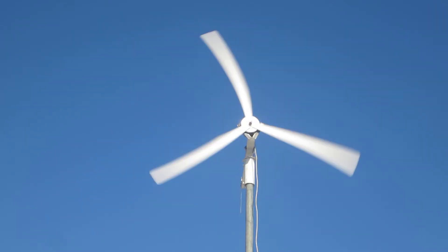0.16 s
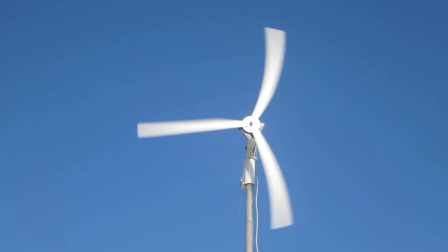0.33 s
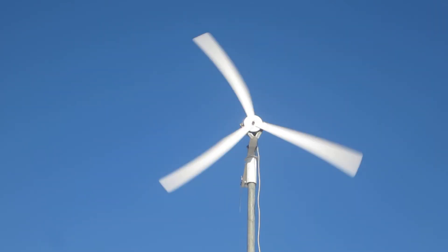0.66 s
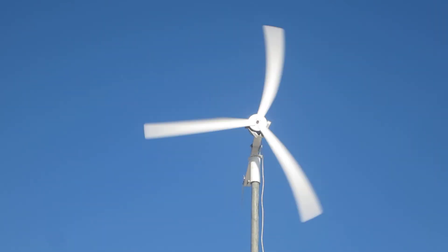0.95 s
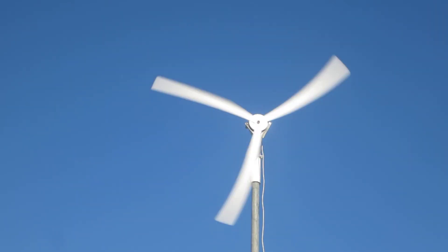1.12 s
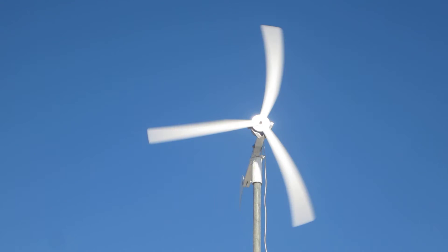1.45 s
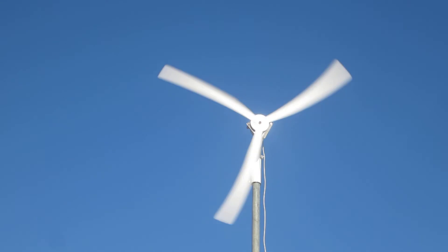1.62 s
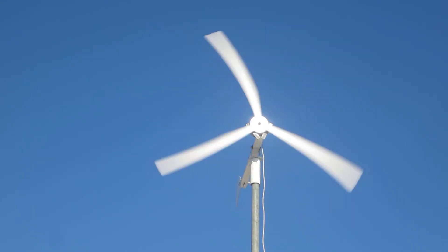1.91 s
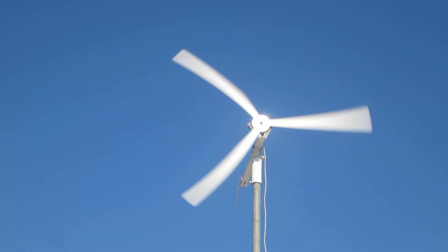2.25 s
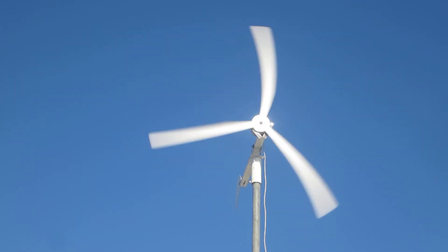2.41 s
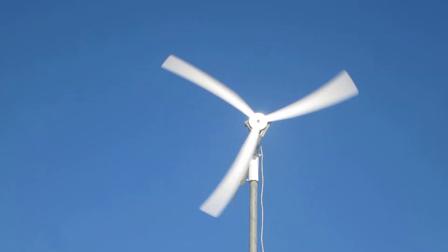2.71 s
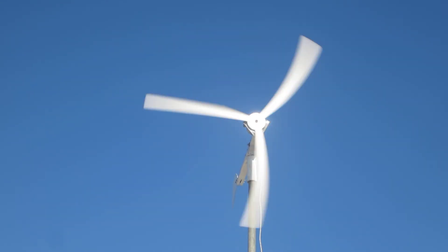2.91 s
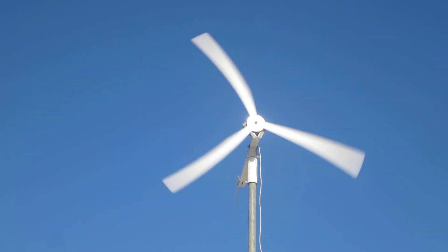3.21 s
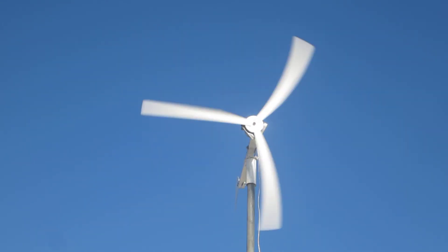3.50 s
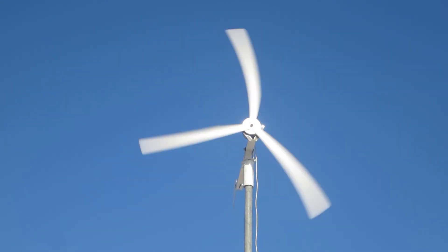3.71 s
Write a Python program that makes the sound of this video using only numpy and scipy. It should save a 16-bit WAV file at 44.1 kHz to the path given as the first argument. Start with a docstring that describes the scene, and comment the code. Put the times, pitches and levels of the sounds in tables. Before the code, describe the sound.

Low wind rumble close on the microphone, with soft hiss behind and a barely audible thin whine; a tiny bright click comes first, gusts thump early, ease off, and return strongly late.

```python
"""Wind blows across a microphone under a small wind turbine: shaped noise rumbles and flutters in gusts.
Single eddies thump the microphone as short pressure swings, each with a faster ragged edge.
One sharp tick near the start is a set of decaying sines plus a tiny noise scrape.
Behind them: a faint hollow moan and steady hiss with brief swells (band noise), and a thin whine (sines)."""
import sys
import numpy as np
from scipy import signal
from scipy.fft import rfft, irfft
from scipy.io import wavfile

SR = 44100
rng = np.random.default_rng(int(sys.argv[2]) if len(sys.argv) > 2 else 0)


def generate_wav(signal):
    """Clip the signal to [-1, 1] and save it as 16-bit WAV at the path in sys.argv[1]."""
    frames = np.transpose(np.atleast_2d(signal))
    scaled = np.clip(frames, -1, 1) * 32767
    pcm = np.round(scaled).astype(np.int16)
    wavfile.write(sys.argv[1], SR, pcm)


N = 170226
TIME_S = np.arange(N) / SR

# wind strength at the microphone: t/s, relative strength/dB
WIND = [(0, 2), (.1, -6.5), (.23, 7.5), (.34, -2.5), (.44, -6), (.55, -1.5), (.66, -0.5), (.8, -3.5),
        (.96, -5), (1.17, -1.5), (1.27, -2), (1.38, -1), (1.47, -3.5), (1.6, -3), (1.72, -7), (1.87, 0),
        (2.05, -7), (2.33, -4.5), (2.58, -7.5), (2.78, -4.5), (2.92, 0), (3.15, -4), (3.3, -1), (3.44, 2.5),
        (3.56, 1.5), (3.69, 1.5), (3.76, 0), (3.86, 1.5)]
# turbulence spectra: f/Hz, relative density/dB
RUMBLE_SPECTRUM = [(8, -21), (22, -6.5), (45, -0.5), (95, -2), (140, -7.5), (220, -18.5), (400, -37),
                   (1000, -78)]
FLUTTER_SPECTRUM = [(40, -22), (100, -7.5), (150, -1), (250, -5.5), (350, -16), (520, -29.5), (1000, -60),
                    (3000, -61)]
# eddies: t/s, relative level/dB, nominal f/Hz, edge level re eddy/dB
EDDIES = [(.146, -17, 91, -22), (0.185, -23.5, 146, -25), (0.198, -15, 210, -26), (0.215, -16.5, 265, -31),
          (0.225, -14, 135, -14.5), (.251, -12, 159, -22), (.276, -15.5, 119, -30), (0.302, -20, 132, -31),
          (0.509, -11.5, 251, -34), (.522, -24, 150, -23), (0.633, -21.5, 100, -24),
          (0.652, -15.5, 163, -19), (0.717, -22.5, 182, -32), (.889, -19.5, 62, -22), (1.063, -24, 90, -15),
          (1.136, -21.5, 140, -25), (1.15, -22.5, 189, -20), (1.186, -27, 228, -25), (1.222, -23, 121, -28),
          (1.276, -26, 115, -24), (1.345, -24, 177, -24), (1.369, -23, 134, -13.5), (1.387, -26, 220, -24),
          (1.428, -26.5, 190, -22), (1.528, -21, 62, -20), (1.551, -21.5, 55, -18), (1.565, -18, 168, -20),
          (1.833, -25, 170, -30), (1.856, -18, 219, -34), (2.333, -28, 156, -24), (2.675, -28, 55, -22),
          (2.88, -24.5, 82, -34), (3.368, -17, 89, -20), (3.389, -14.5, 80, -24), (3.398, -22.5, 150, -20),
          (3.424, -18, 225, -28), (3.443, -8, 121, -15.5), (3.451, -8.5, 175, -14),
          (3.474, -21.5, 235, -32), (3.498, -17, 157, -25), (3.531, -17, 158, -13.5),
          (3.612, -22, 160, -24), (3.716, -14.5, 120, -16), (3.726, -24.5, 268, -16),
          (3.733, -14.5, 250, -12.5), (3.738, -16.5, 90, -20), (3.744, -20.5, 170, -19),
          (3.768, -19, 140, -14), (3.782, -24, 110, -22)]
# tick ringing: f/Hz, relative level/dB, t60/s
TICK_MODES = [(2480, -15.5, 0.014), (3920, -11, 0.015), (4430, 2, 0.0086), (4970, -14, 0.02),
              (5550, -6, .008), (7160, 0, 0.0059), (8930, -0.5, 0.0052), (10330, 2, 0.0045),
              (11900, -6, 0.004), (13300, -8, .0035)]
# tick scrape spectrum: f/Hz, relative density/dB
SCRAPE_SPECTRUM = [(2000, -16), (4300, -3), (7000, 0), (11000, 1), (15500, -13)]
# hollow note in the wind: t/s, level/dB
MOAN_LEVEL = [(0, -67.5), (1.9, -72.5), (2.65, -55), (3.1, -71), (3.86, -69)]
# faint machine tones: f/Hz, rms level/dB
TONES = [(1794, -73.5), (1841, -76), (1964, -78), (13195, -96), (13517, -97)]
# thin whine, a cluster of close lines: f/Hz, rms level/dB
WHINE = [(7642, -92), (7672, -91), (7703, -92), (7732, -88.5), (7792, -86.5), (7852, -79), (7882, -80.5),
         (7942, -89), (8002, -92), (8032, -94)]
# outdoor hiss spectrum: f/Hz, relative density/dB
AIR_SPECTRUM = [(30, -5), (250, -1), (450, 1.5), (680, -1), (800, 0), (1050, -1.5), (1400, -6), (2000, -11),
                (2800, -16), (3400, -17), (4600, -21.5), (6500, -24.5), (8500, -27), (11000, -30.5),
                (13500, -34), (15800, -39)]
# swells of high hiss: t/s, Gaussian sigma/s, peak level/dB, centre f/Hz
SWELLS = [(.2, 0.046, -65, 3670), (.58, .05, -70, 3700), (1.2, 0.015, -60.5, 4230), (1.25, 0.14, -67, 3420),
          (2.54, 0.03, -61.5, 3600), (3.84, 0.11, -68, 3670)]

# FOLLOW: dB of level per dB of wind strength
RUMBLE_DB, RUMBLE_FOLLOW, RUMBLE_LUMPS_DB = -33.5, 0.81, 2.5
FLUTTER_DB, FLUTTER_FOLLOW, FLUTTER_LUMPS_DB = -40.5, 1.52, 3.5
LUMPS_HZ = 29
# a higher shape swings more often: slow eddies give one push
EDDY_SHAPE, EDDY_SHAPE_PER_HZ, EDDY_DB = 1.33, 0.021, 0.56
EDGE_FREQ_RATIO = 2.67
TICK_S, TICK_RISE_S, TICK_RING_DB = 0.0837, 0.00066, -26
SCRAPE_DB, SCRAPE_DECAY_S = -40, 0.0014
MOAN_HZ, MOAN_WIDTH_HZ = 745, 21
TONE_WAVER_HZ, TONE_WAVER_RATE_HZ = 1.5, 14
AIR_DB, AIR_WAVER_DB, AIR_WAVER_RATE_HZ = -48, 0.5, 34
SWELL_SIGMA_OCTAVES = 0.22
LOWPASS_HZ = 15850


def amp(db):
    """Decibels to gain."""
    return 10 ** (np.asarray(db) / 20)


def unit(x):
    """Scale to an rms of one."""
    return x / np.sqrt(np.mean(x ** 2) + 1e-20)


def noise(gain):
    """Unit-rms noise whose amplitude spectrum follows gain(f/Hz)."""
    spectrum = rfft(rng.standard_normal(N))
    return unit(irfft(spectrum * gain(np.fft.rfftfreq(N, 1 / SR)), N))


def coloured(points):
    """Unit-rms noise with a spectrum interpolated over log frequency, rolled off past the last point."""
    hz, db = np.transpose(points)

    def gain(f):
        level_db = np.interp(np.log(f + 1), np.log(hz), db)
        return amp(level_db) / (1 + (f / (2 * hz[-1])) ** 4)

    return noise(gain)


def wander(rate_hz):
    """Smooth random drift, low-passed near rate_hz, with its extremes softened."""
    drift = noise(lambda f: 1 / (1 + (f / rate_hz) ** 4))
    return 2 * np.tanh(drift / 2)


def turbulence():
    """Lumpy pressure noise at the microphone; flutter grows faster than rumble as the wind rises."""
    wind_db = np.interp(TIME_S, *np.transpose(WIND))
    lumps = wander(LUMPS_HZ)
    rumble_db = RUMBLE_DB + RUMBLE_FOLLOW * wind_db + RUMBLE_LUMPS_DB * lumps
    flutter_db = FLUTTER_DB + FLUTTER_FOLLOW * wind_db + FLUTTER_LUMPS_DB * lumps
    return coloured(RUMBLE_SPECTRUM) * amp(rumble_db) + coloured(FLUTTER_SPECTRUM) * amp(flutter_db)


def swing(t, hz, turn):
    """Smooth pressure swing of a cycle or two centred on t = 0; turn is its phase in cycles."""
    shape = np.clip(EDDY_SHAPE + EDDY_SHAPE_PER_HZ * hz, 2, 9)
    pulse = (1 - 2j * np.pi * hz * t / (shape - 0.5)) ** -shape
    return (np.exp(2j * np.pi * turn) * pulse).real


def eddies():
    """Each passing eddy pushes and pulls the diaphragm, and sheds a smaller, faster one as its edge."""
    out = np.zeros(N)
    turns = rng.random((len(EDDIES), 2))
    for (at_s, db, hz, edge_db), (turn, edge_turn) in zip(EDDIES, turns):
        near = abs(TIME_S - at_s) < 10 / hz
        t = TIME_S[near] - at_s
        push = swing(t, hz, turn)
        edge = amp(edge_db) * swing(t, hz * EDGE_FREQ_RATIO, edge_turn)
        out[near] += amp(db + EDDY_DB) * (push + edge)
    return out


def tick():
    """A small hard part clicks once: a tiny noise scrape and short, bright decaying modes."""
    t = np.maximum(TIME_S - TICK_S, 0)
    ring = np.zeros(N)
    for hz, db, t60_s in TICK_MODES:
        decay_db = 60 * np.minimum(t / t60_s, 10)
        ring += amp(db - decay_db) * np.sin(2 * np.pi * hz * t)
    scrape = coloured(SCRAPE_SPECTRUM) * np.exp(-t / SCRAPE_DECAY_S)
    rise = np.minimum(t / TICK_RISE_S, 1)  # zero before the tick
    return rise * (amp(TICK_RING_DB) * ring + amp(SCRAPE_DB) * scrape)


def moan():
    """Narrow, airy resonance: band noise that rises a little out of the hiss."""
    band = noise(lambda f: np.exp(-2 * ((f - MOAN_HZ) / MOAN_WIDTH_HZ) ** 2))
    return band * amp(np.interp(TIME_S, *np.transpose(MOAN_LEVEL)))


def whine():
    """Faint machine tones and a thin high whine: sines sharing one slight frequency waver."""
    waver_cycles = TONE_WAVER_HZ * np.cumsum(wander(TONE_WAVER_RATE_HZ)) / SR
    out = np.zeros(N)
    for hz, db in TONES + WHINE:
        cycles = hz * TIME_S + waver_cycles + rng.random()
        out += np.sqrt(2) * amp(db) * np.sin(2 * np.pi * cycles)
    return out


def air():
    """Steady wind hiss from all around, as broadband noise, with brief bright band-noise swells."""
    out = coloured(AIR_SPECTRUM) * amp(AIR_DB + AIR_WAVER_DB * wander(AIR_WAVER_RATE_HZ))
    for at_s, sigma_s, db, hz in SWELLS:
        band = noise(lambda f: np.exp(-0.5 * (np.log2((f + 1) / hz) / SWELL_SIGMA_OCTAVES) ** 2))
        out += amp(db) * np.exp(-0.5 * ((TIME_S - at_s) / sigma_s) ** 2) * band
    return out


def scene():
    """Sum of all sources at one microphone, as one channel."""
    return (turbulence() + eddies() + tick() + moan() + whine() + air())[None]


def record(dry):
    """Band limit of the recorder: a linear-phase low-pass."""
    lowpass = signal.firwin(511, LOWPASS_HZ, window=("kaiser", 9), fs=SR)
    return signal.oaconvolve(dry, lowpass[None], "same")


dry = scene()
out = record(dry)
generate_wav(out)
```